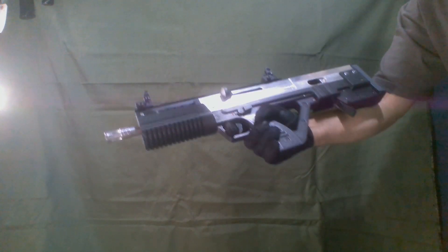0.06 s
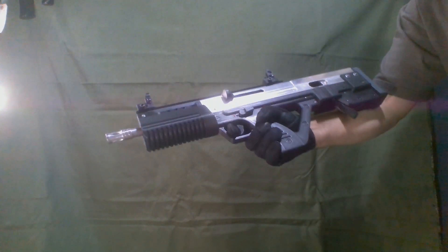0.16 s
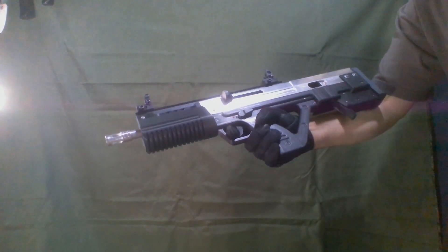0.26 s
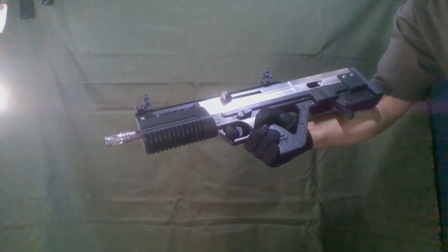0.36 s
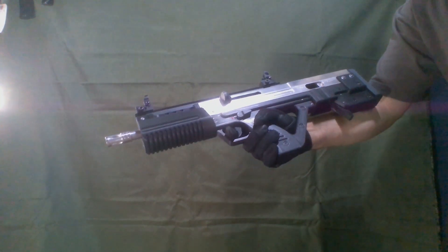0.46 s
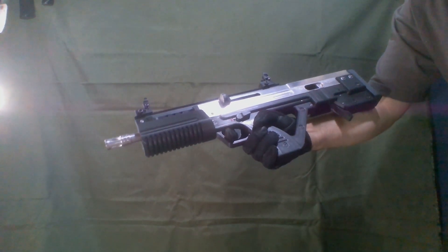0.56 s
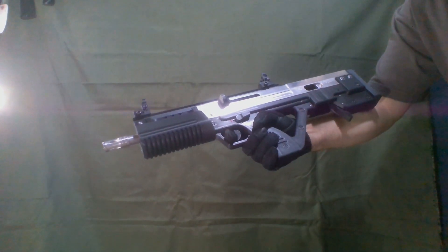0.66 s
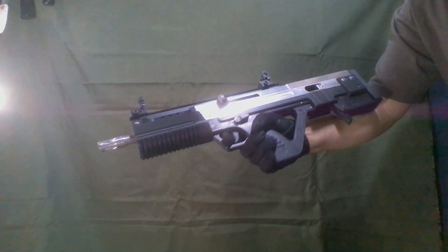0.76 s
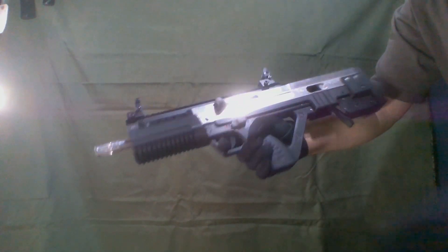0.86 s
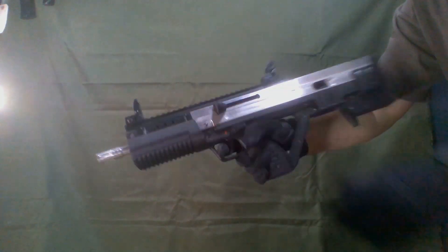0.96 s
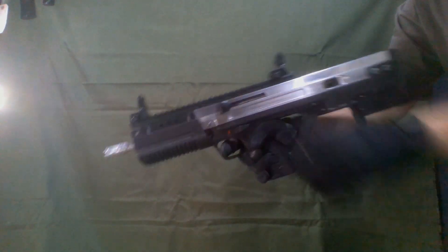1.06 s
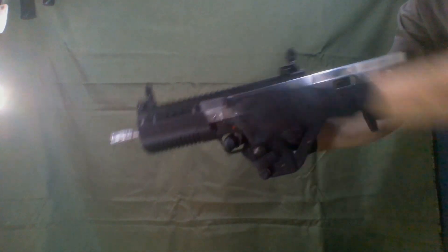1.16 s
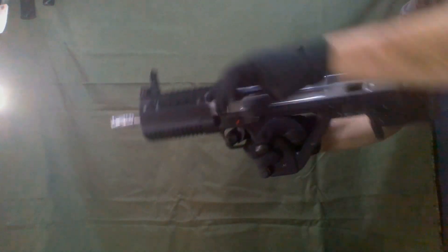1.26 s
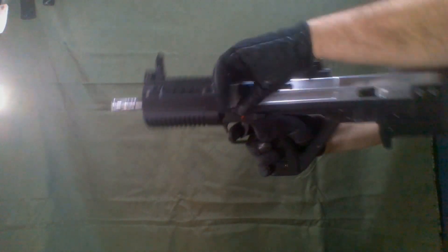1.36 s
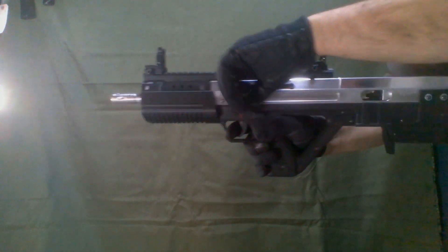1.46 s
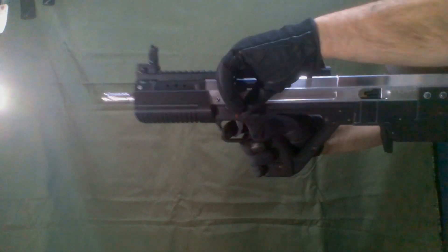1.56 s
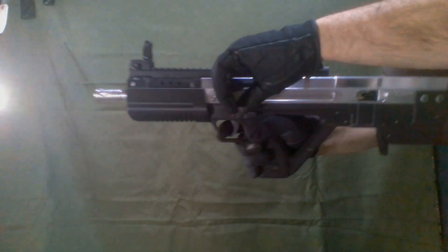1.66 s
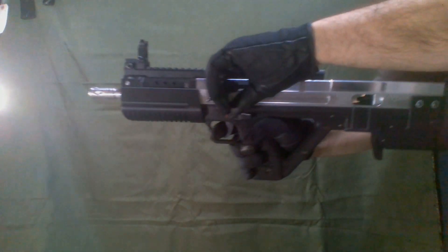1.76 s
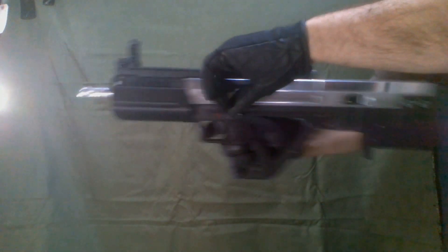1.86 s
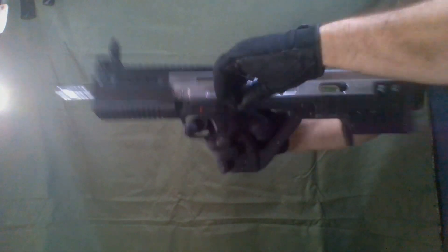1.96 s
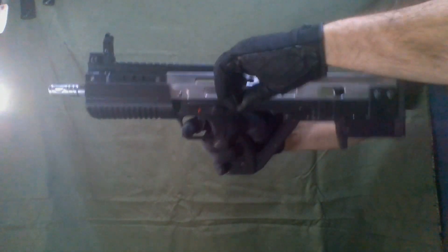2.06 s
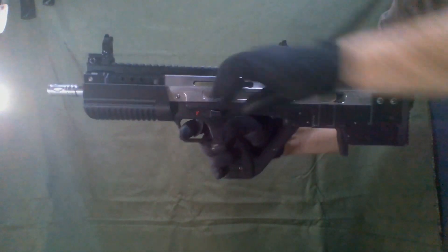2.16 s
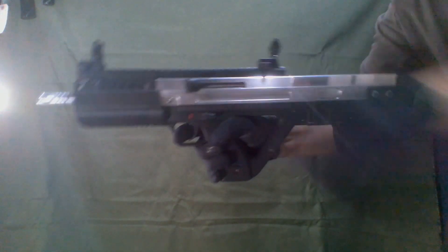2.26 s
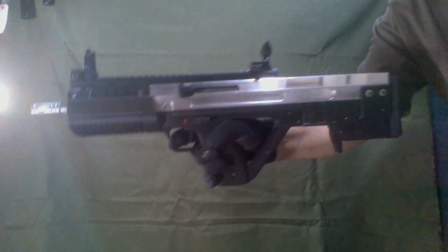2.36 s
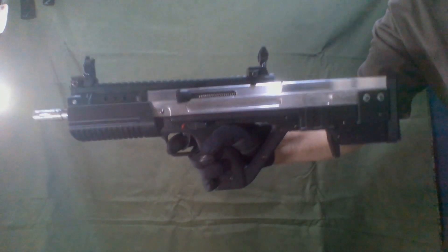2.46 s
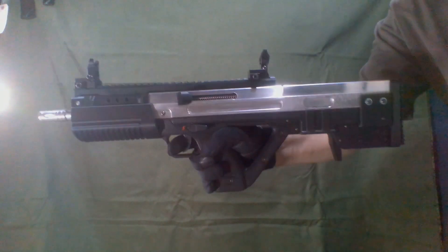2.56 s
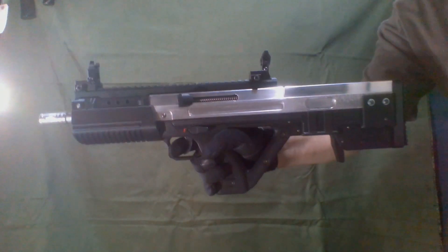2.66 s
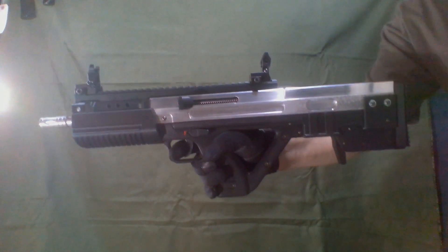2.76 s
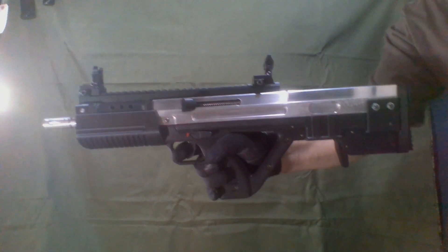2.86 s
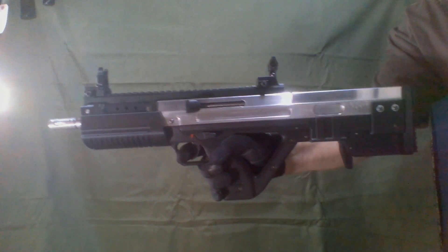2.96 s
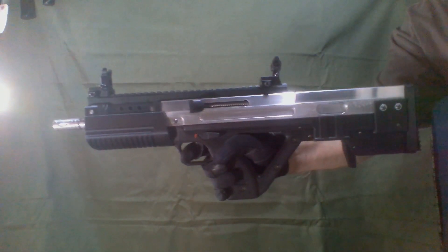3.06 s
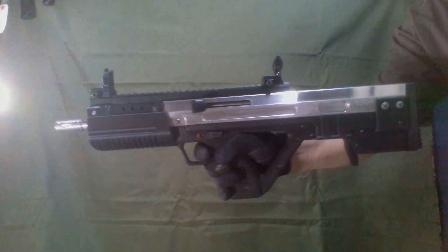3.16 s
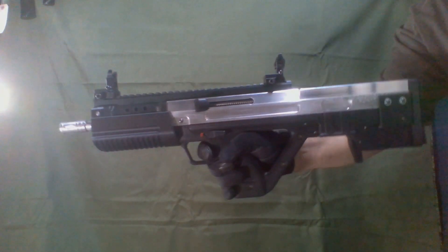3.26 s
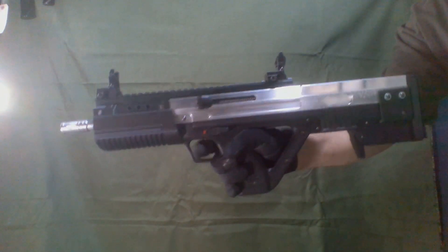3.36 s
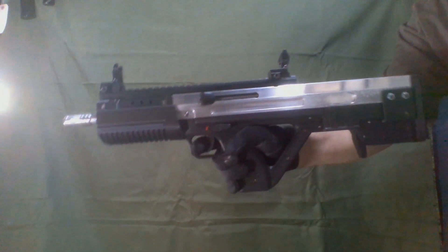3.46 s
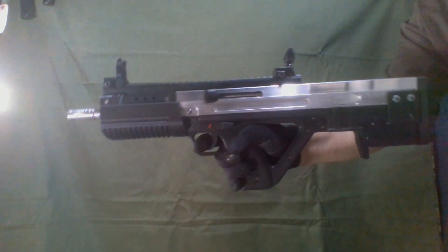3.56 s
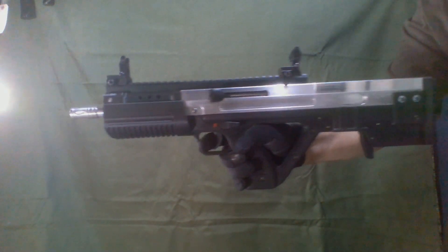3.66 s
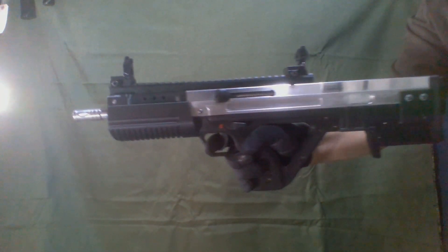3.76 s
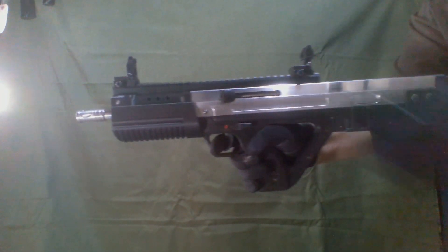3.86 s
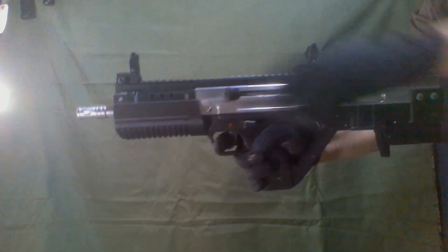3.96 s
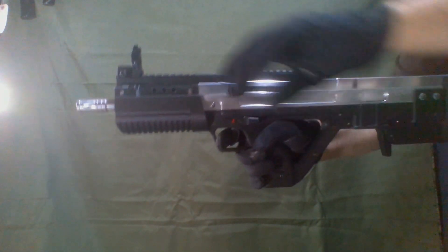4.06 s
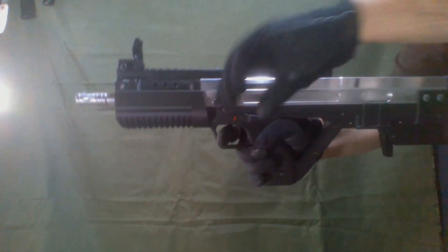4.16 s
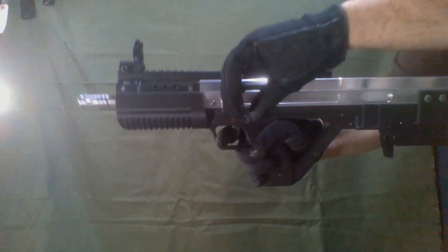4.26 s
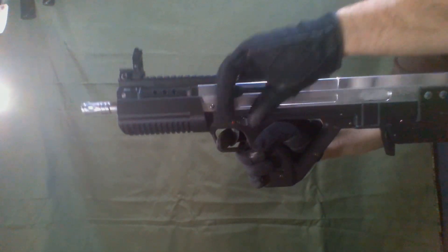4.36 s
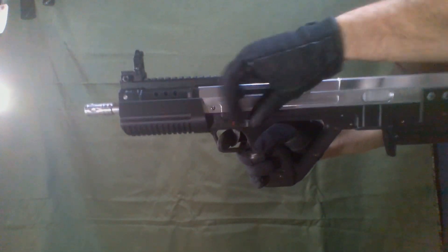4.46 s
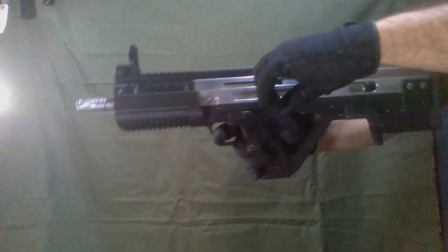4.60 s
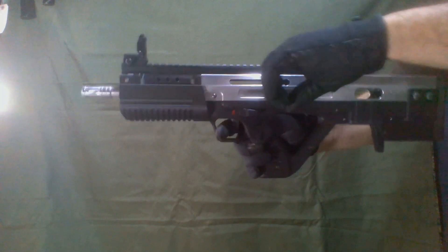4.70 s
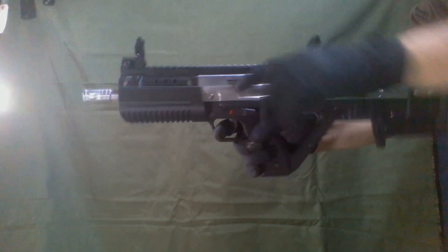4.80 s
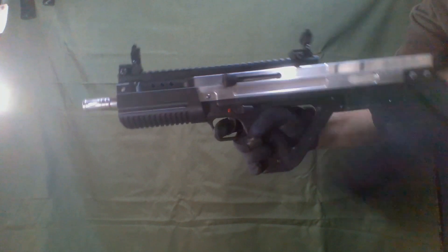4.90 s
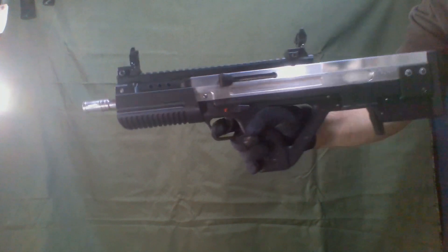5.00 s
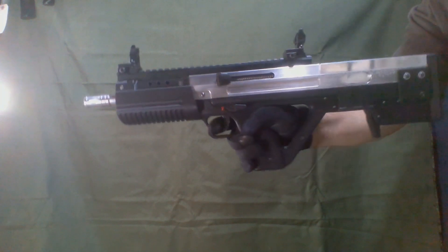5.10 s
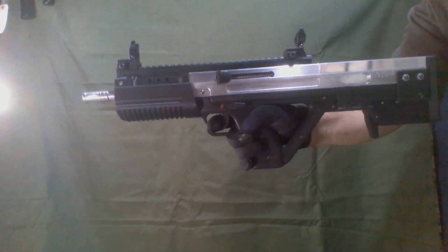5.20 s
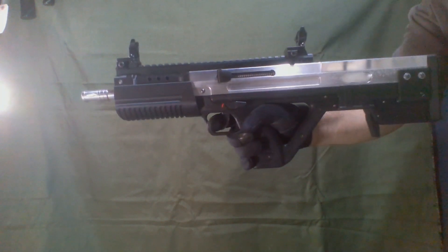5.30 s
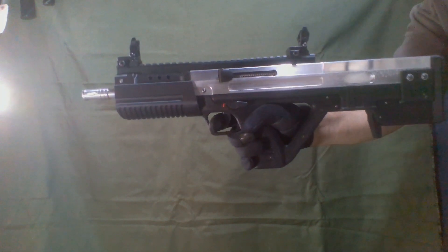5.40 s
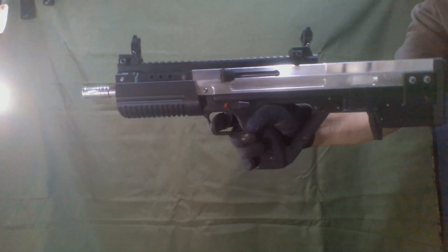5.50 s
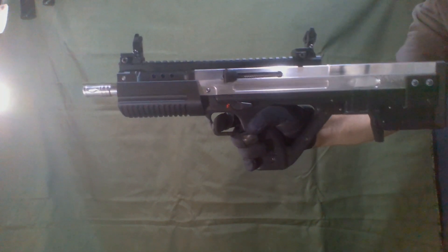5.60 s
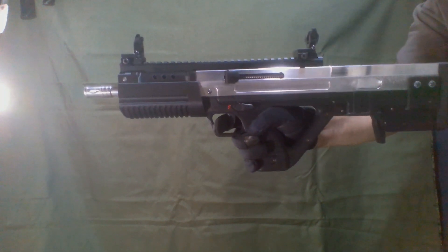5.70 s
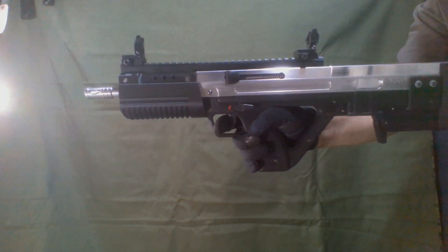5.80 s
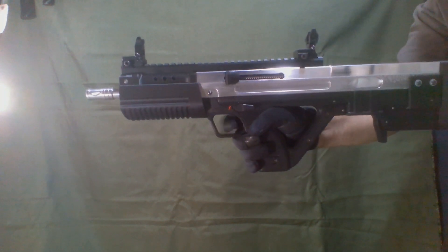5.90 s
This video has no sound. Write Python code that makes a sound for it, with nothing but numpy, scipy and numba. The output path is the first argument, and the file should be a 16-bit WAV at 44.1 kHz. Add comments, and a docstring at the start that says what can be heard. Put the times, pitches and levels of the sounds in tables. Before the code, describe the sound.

In a small room, close stereo microphone, a low motor hum and faint hiss run throughout. A flurry of dull, boomy knocks comes first. Then a carbine's handle clacks, its bolt slams home with a bright steel clatter, and the trigger snaps dry. The cycle repeats with a rattlier pull, another slam and a weaker snap at the very end. No shots.

```python
"""Handling of an airsoft carbine

Dull knocks close to a small stereo camera come first: noise bursts through low, damped resonances.
Then, twice over, the bolt is drawn back, slams forward, and the trigger lets it snap: bursts and
grains of noise excite the modes of steel parts and a hollow frame, and a room adds reverberation.
A motor hums as a long series of harmonics over broad noise; a limiter ducks these after loud blows."""
import sys
import numpy as np
from scipy import signal
from scipy.fft import rfft, irfft, next_fast_len
from scipy.io import wavfile
from scipy.ndimage import map_coordinates
from numba import njit

SR = 44100
rng = np.random.default_rng(int(sys.argv[2]) if len(sys.argv) > 2 else 0)


def log_audio(samples):
    """Write samples as a 16-bit WAV file to the path given in sys.argv[1]."""
    # one column per channel
    frames = np.atleast_2d(samples).T
    # limit to full scale, then quantise
    limited = np.clip(frames, -1, 1)
    pcm = np.round(limited * 32767).astype(np.int16)
    wavfile.write(sys.argv[1], SR, pcm)


N = 261954
SPAN = 8192  # room for filter tails, samples

# Levels in the tables are relative: the filters, the mix and the limiter act on them afterwards.
# broad noise: spectral density [f/Hz, level/dB]
AIR_SPECTRUM = [(15, -3), (60, -7.5), (170, -15.5), (345, -12.5), (635, -23.5), (825, -21.5), (1310, -15.5),
                (1970, -17), (2280, -26), (3370, -22.5), (4320, -23.5), (5360, -25.5), (6580, -21.5),
                (7540, -23.5), (10100, -26.5), (15500, -25.5)]
# broad noise: likeness of the two ports [f/Hz, correlation]
AIR_CORRELATION = [(60, 0.59), (300, 0.85), (1400, 0.054), (3000, 0.065)]
# motor speed [t/s, turns per second]
MOTOR_SPEED = [(0, 49.21), (1.3, 49.165), (2.8, 49.163), (4, 49.2), (5.94, 49.206)]
# motor harmonics [multiple of the speed, level/dB, left minus right level/dB]
MOTOR_HARMONICS = [(6, -46, -3), (7, -37, -2), (8, -39, 2), (9, -50, 11), (10, -57, 0), (14, -56, -5),
                   (17, -51, 0), (18, -56, -1), (20, -58, -1), (21, -56, -2), (22, -56, -4), (24, -48, -10),
                   (26, -49, 1), (27, -56, -2), (28, -51, -6), (29, -54, 6), (30, -50, 10), (31, -57, 14),
                   (40, -51, 1), (41, -58, 1), (66, -58, -10), (67, -62, -11), (69, -62, -18),
                   (70, -60, -9), (72, -62, -15)]
# steady tones unrelated to the motor [f/Hz, level/dB]
STEADY_TONES = [(229.85, -46), (1780.9, -51)]
# slow swings of the signal's middle [t/s, left size, right size, standard deviation/s]
BASELINE_SWINGS = [(.43, .025, .055, 0.012), (.53, -.025, -0.036, 0.055), (2.192, 0.13, 0.044, 0.0086),
                   (4.802, 0.0068, -.075, 0.0021), (4.81, 0.044, -0.018, .009),
                   (4.86, -0.017, -0.0062, 0.049)]
# reverberation time of the room [f/Hz, t60/s]
ROOM_T60 = [(200, 0.28), (1200, 0.21), (6000, 0.18), (14000, 0.11)]
# knocks near the camera [t/s, knock level/dB, knock f/Hz, thud level/dB, click level/dB]
KNOCK_EVENTS = [(0.2953, -15.5, 1140, -10.5, -34.5), (0.3015, -38, 920, -20.5, -29),
                (0.358, -28, 760, -18.5, -46), (0.405, -25.5, 1180, -41, -32),
                (0.424, -5.5, 2040, -9.5, 3.5), (0.465, -37, 750, -15, -44), (0.481, 3, 1000, -2, -9.5),
                (0.492, 6.5, 1340, 3.5, 4), (0.499, -8, 1500, 1, -51), (0.509, -2.5, 1210, -12, -45),
                (0.526, 6.5, 1370, 1, -18), (0.545, -6, 1400, -7.5, -34)]
# modes of the shell [f/Hz, width/Hz, level/dB]
SHELL_MODES = [(67.3, 10, 1), (277, 56, -0.59), (536, 74, 0.78)]
# modes of the clicking catch [f/Hz, width/Hz, level/dB]
CATCH_MODES = [(2150, 260, 7), (3970, 220, 0), (4610, 250, -3), (6310, 250, -7), (7320, 250, -2),
               (10200, 300, -4)]
# modes of the hollow frame [f/Hz, width/Hz, level/dB]
FRAME_MODES = [(520, 190, -6), (788, 190, -6.5), (1000, 44, 4), (1323, 150, -3.5), (1616, 170, -3.5),
               (1760, 50, -2)]
# modes of the steel parts [f/Hz, width/Hz, level/dB]
STEEL_MODES = [(3987, 150, -2.5), (4900, 170, 0.5), (5570, 270, -8), (5960, 41, -12.5), (6460, 63, 4.5),
               (7620, 230, 5.5), (7850, 280, -7), (8340, 720, 10), (9130, 450, 4), (9200, 200, -14.5)]
# harder contacts ring brighter [steel level/dB, f/Hz]
STEEL_BRIGHTNESS = [(-21, 4740), (3.5, 6410)]
# the bolt slams home [t/s, strength level/dB]
SLAM_EVENTS = [(2.183, -2.5), (4.7995, -2.5)]
# contacts within a slam [t/s from the blow, steel level/dB, frame level/dB, frame f/Hz]
SLAM_CONTACTS = [(-.0185, -1.5, -21, 1566), (-.012, 0, -12.5, 1450), (-.004, 6, -7.5, 1270),
                 (0, 10.5, 1, 1070), (.0055, 12.5, 0.5, 1345), (.016, 12.5, 2, 1150), (.0435, 8.5, 0, 1040),
                 (.053, 7, -5.5, 1270), (.066, 1, -7.5, 1400)]
# the trigger lets the striker go [t/s, strength level/dB]
SNAP_EVENTS = [(3.133, -4.5), (5.921, -10.5)]
# contacts within a snap: the frame swells, then the steel answers
# [t/s from the blow, steel level/dB, frame level/dB, frame f/Hz]
SNAP_CONTACTS = [(-.009, -23.5, -22.5, 1710), (-.0055, -9, -12.5, 1615), (-.002, -6, -0.5, 1620),
                 (0, 7, 4, 1730), (.003, 14, -9.5, 1650), (.008, -3, -11.5, 1700)]
# single contacts of handle and catches [t/s, steel level/dB, frame level/dB, frame f/Hz]
SINGLE_CONTACTS = [(1.876, 8, -8, 1224), (1.879, -6, -13, 1430), (1.882, -1.5, -18, 1360),
                   (1.905, -9, -8.5, 1000), (3.357, -38.5, -30.5, 1420), (4.159, -26.5, -32, 1310),
                   (4.361, -32, -37.5, 1380), (4.44, -16.5, -25.5, 1150), (4.455, -22, -27, 1370),
                   (4.4772, 5, -14, 1283), (4.481, -8.5, -12, 1370), (4.495, -3.5, -16, 1730),
                   (4.5004, 0, -15, 1810), (4.518, -9.5, -18, 1590), (4.5234, 6, -11, 1610),
                   (4.566, -13, -18, 1040), (4.574, -28.5, -18, 1050), (5.89, -27.5, -41, 1400)]
# the handle is drawn back along the rails [t/s of loudest rattle, level/dB, swell/s, fade/s]
HANDLE_PULLS = [(1.885, -15.5, 0.059, .04), (4.51, -12.5, .09, 0.072)]

# rattle around a blow: (t/s of loudest rattle from the blow, level/dB, swell/s, fade/s)
SLAM_RATTLE, SNAP_RATTLE = (0.013, 2, 0.062, 0.096), (-.004, -8, 0.01, 0.04)
RATTLE_RANGE_DB = 34.5  # climbed in one swell time, lost in one fade time
# kinds of contact: (decay t60/s, relative width of the frame's broad response, size of the first push)
SLAM_TOUCH, SNAP_TOUCH, SINGLE_TOUCH = (0.035, 1.62, 4.2), (0.027, 0.81, 0), (0.019, 1.03, 1)
KNOCK_T60_S, THUD_T60_S, CLICK_T60_S = 0.036, 0.045, 0.022
SOFT_HZ, SOFT_Q = 2300, 0.45  # low-pass of a padded contact
BOOM_DB, BOOM_GROWTH = 36.5, 0.28  # the stand's boom follows the thud level only weakly
# a tone as strong as the seventh harmonic beats with it; they first cancel at this moment
NEIGHBOUR_HZ, CANCEL_S = 344.705, 1.4
SWING_CUT_HZ = 1.1
MICROPHONE_HZ, TOP_HZ = 9000, 15650
ATTACK_S, HOLD_S, RELEASE_S = 0.0001, 0.085, 0.24
THRESHOLD_DB, CEILING = -1.83, 0.82


def amp(db):
    """Decibel law: the amplitude ratio of a level."""
    return 10 ** (np.asarray(db) / 20)


def unit(x):
    """Normalization: the signal scaled to unit rms."""
    return x / np.sqrt(np.mean(x ** 2) + 1e-20)


def along(points, hz):
    """Interpolation of (f, value) points on a logarithmic frequency axis."""
    f, value = np.transpose(points)
    return np.interp(np.log(hz + 1), np.log(f + 1), value)


def curve(rows):
    """Linear interpolation of (t, value) rows at every sample."""
    return np.interp(np.arange(N) / SR, *np.transpose(rows))


def wobble(rate):
    """Spline interpolation: a smooth random curve through `rate` knots a second."""
    knots = rng.standard_normal(int(N * rate / SR) + 4)
    return map_coordinates(knots, [np.arange(N) * rate / SR])


def filtered(x, response):
    """Linear filtering: the spectrum times a complex response of frequency."""
    n = x.shape[-1]
    m = next_fast_len(n + SPAN)
    return irfft(rfft(x, m) * response(np.fft.rfftfreq(m, 1 / SR)), m)[..., :n]


def peak(f, hz, width_hz):
    """Damped resonance: the causal second-order band-pass response of one mode."""
    return 1j * f * width_hz / (hz * hz - f * f + 1j * f * width_hz)


def low_pass(f, hz, q):
    """Inertia and damping: a second-order response that falls above its corner."""
    return 1 / (1 + 1j * f / hz / q - (f / hz) ** 2)


def body(modes, hz, spread, broad_db):
    """Modal superposition: randomly reweighted modes on a broad response, favoured near one tone."""
    chance_db = rng.normal(0, 3, len(modes))

    def response(f):
        ringing = sum(amp(db + chance) * peak(f, mode_hz, width_hz)
                      for (mode_hz, width_hz, db), chance in zip(modes, chance_db))
        return peak(f, hz, spread * hz) ** 2 * (amp(broad_db) + ringing)

    return response


def burst(response, t60, alike, push=0., rise=.0013):
    """Impact excitation: a push and decaying stereo noise filtered by a body, unit rms over 4 ms."""
    t = np.arange(SPAN // 2) / SR
    envelope = amp(-60 * t / t60) * (1 - np.exp(-t / rise))
    common, opposed = rng.standard_normal((2, len(t))) * envelope
    turn = np.arccos(np.clip(alike, 0, 1)) / 2  # cos(2 turn) is the correlation of the ports
    noise = np.cos(turn) * common + np.sin(turn) * np.array([opposed, -opposed])
    x = filtered(noise + push * (t == 0), response)
    return x / np.sqrt(np.mean(x[:, :SR // 250] ** 2))


def add(track, s, x):
    """Superposition: mixes x into the track at time s."""
    track[:, round(s * SR):][:, :x.shape[1]] += x


def air():
    """Partial coherence: room air and microphone hiss, most alike at the two ports in the bass."""
    turn = lambda hz: np.arccos(np.clip(along(AIR_CORRELATION, hz), -1, 1)) / 2
    response = lambda hz: amp(along(AIR_SPECTRUM, hz)) * [np.cos(turn(hz)), np.sin(turn(hz))]
    mid, side = filtered(rng.standard_normal((2, N)), response)
    return amp(-38.0 + 0.21 * wobble(23)) * unit(np.array([mid + side, mid - side]))


def motor_harmonics(turns, t):
    """Harmonic series of a rotation: sines at multiples of the speed, one beating with a neighbour."""
    out = np.zeros((2, N))
    waver_db = [1.2 * wobble(4.71) for _ in range(4)]
    for k, db, pan_db in MOTOR_HARMONICS:
        start, lead = rng.uniform(0, 2 * np.pi), rng.normal(0.3, 0.52)
        if k < 10:  # the low harmonics keep loosely in step, one throb a turn
            start = .95 * abs(k - 7)
        cycles = [k * turns]
        if k == 7:
            opposite = k * turns[round(CANCEL_S * SR)] + .5
            cycles.append(opposite + NEIGHBOUR_HZ * (t - CANCEL_S))
        for port, side in enumerate((.5, -.5)):
            level_db = db - 0.54 + side * pan_db + waver_db[int(k) % 4]
            tone = sum(np.sin(2 * np.pi * c + start + side * lead) for c in cycles)
            out[port] += amp(level_db) * tone
    return out


def faint_harmonics(turns):
    """Fourier synthesis: one fixed random waveform for each port, repeated every turn."""
    k = np.arange(512)
    faint = amp(-65 - .06 * k + rng.normal(0, 3.5, (2, k.size))) * (k > 9) * (k < 110)
    faint[:, [int(row[0]) for row in MOTOR_HARMONICS]] = 0
    waves = irfft(faint * np.exp(2j * np.pi * rng.random(faint.shape))) * (k.size - 1)
    phase = np.linspace(0, 1, waves.shape[1], endpoint=False)
    return amp(4.0) * np.array([np.interp(turns % 1, phase, wave, period=1) for wave in waves])


def hum():
    """Periodicity: strong and faint harmonics of one motor speed, with two unrelated tones."""
    turns, t = np.cumsum(curve(MOTOR_SPEED)) / SR, np.arange(N) / SR
    out = motor_harmonics(turns, t) + faint_harmonics(turns)
    for hz, db in STEADY_TONES:
        out += amp(db + 0.47 * wobble(4.07)) * np.sin(2 * np.pi * hz * t)
    return out


def swings():
    """High-pass rebound: smooth bumps under the hardest blows, turned back slowly by the input's low cut."""
    t = np.arange(N) / SR
    bumps = sum(np.outer(size, np.exp(-.5 * ((t - s) / width) ** 2))
                for s, *size, width in BASELINE_SWINGS)
    low_cut = lambda f: -f * f / (SWING_CUT_HZ ** 2 + 1j * f * SWING_CUT_HZ * 1.9 - f * f)
    return filtered(bumps, low_cut)


def room(x):
    """Reverberation: frequency-dependent decay, with a new tail each third of a second as the carbine moves."""
    out, step = np.zeros((2, N + 2 * SR)), SR // 3
    for i in range(0, N, step):
        hz, t, grid = signal.stft(rng.standard_normal((2, SR // 2)), SR, nperseg=256)
        decay = amp(-60 * t / along(ROOM_T60, hz)[:, None])
        tail = signal.istft(grid * decay, SR, nperseg=256)[1]
        reflected = signal.fftconvolve(x[:, i:i + step], tail / np.linalg.norm(tail[0]), axes=1)
        add(out, i / SR + .004, reflected)
    return out[:, :N]


def knocks():
    """Padded impact: a soft mid knock and shell thud, the click of a catch, and the stand's resonance."""
    out, jolts = np.zeros((2, N + SPAN)), np.zeros(N + SPAN)
    soft = lambda f: low_pass(f, SOFT_HZ, SOFT_Q) ** 2
    for s, knock_db, knock_hz, thud_db, click_db in KNOCK_EVENTS:
        shell = body(SHELL_MODES, hz=300, spread=2.87, broad_db=-2.0)
        catch = body(CATCH_MODES, hz=5000, spread=3, broad_db=-10)
        mid = lambda f: peak(f, knock_hz, 0.31 * knock_hz) * soft(f)
        knock = burst(mid, KNOCK_T60_S, alike=0.65, push=4.5)
        thud = burst(lambda f: shell(f) * soft(f), THUD_T60_S, alike=0.71, push=5.1, rise=0.0026)
        click = burst(catch, CLICK_T60_S, alike=.3)
        add(out, s, amp(knock_db) * knock + amp(thud_db) * thud + amp(click_db) * click)
        jolts[round(s * SR)] = amp(BOOM_DB + BOOM_GROWTH * thud_db)
    # the camera's stand goes on booming
    boom = filtered(jolts, lambda f: peak(f, hz=63, width_hz=14.0))
    return amp([[-.6], [.6]]) * (out + boom)[:, :N]


def rattle_db(strokes):
    """Exponential growth and decay: each stroke's level climbs and falls evenly in dB; the loudest wins."""
    t = np.arange(N) / SR
    levels = [db - RATTLE_RANGE_DB * np.maximum((s - t) / swell, (t - s) / fade)
              for s, db, swell, fade in strokes]
    return np.max(levels, axis=0)


def rattle(strokes, steel_gain):
    """Granular excitation: noise of rapidly varying level rings steel and frame as the bolt moves."""
    grains = unit(amp(2.4 * wobble(600)) * rng.standard_normal((2, N)))
    steel = unit(filtered(grains, body(STEEL_MODES, hz=6400, spread=1.66, broad_db=13)))
    shared = grains[0] + 0.15 * grains  # nearly alike at both ports
    frame = unit(filtered(shared, body(FRAME_MODES, hz=1310, spread=3.0, broad_db=5.5)))
    return amp(rattle_db(strokes)) * (steel_gain * steel + amp(-5.5) * frame)


def carbine():
    """Modal excitation: each contact rings the steel and the hollow frame; the bolt's rattle joins them."""
    out = np.zeros((2, N + SPAN))
    steel_gain = amp([[1.6], [-1.6]])  # the bright parts face the left port
    hits = [(*row, *SINGLE_TOUCH) for row in SINGLE_CONTACTS]
    strokes = list(HANDLE_PULLS)
    blows = ((SLAM_EVENTS, SLAM_CONTACTS, SLAM_TOUCH, SLAM_RATTLE),
             (SNAP_EVENTS, SNAP_CONTACTS, SNAP_TOUCH, SNAP_RATTLE))
    for events, contacts, touch, (offset, level_db, *shape) in blows:
        for s, db in events:
            hits += [(s + d, db + steel, db + frame, hz, *touch) for d, steel, frame, hz in contacts]
            strokes.append((s + offset, db + level_db, *shape))
    for s, steel_db, frame_db, frame_hz, t60, spread, push in hits:
        steel_hz = np.interp(steel_db, *np.transpose(STEEL_BRIGHTNESS))
        steel_body = body(STEEL_MODES, steel_hz, spread=0.94, broad_db=7)
        frame_body = body(FRAME_MODES, frame_hz, spread=spread, broad_db=-7.0)
        steel = burst(steel_body, t60, alike=.1)
        frame = burst(frame_body, 0.94 * t60, alike=0.58, push=push)
        add(out, s, amp(steel_db) * steel_gain * steel + amp(frame_db) * frame)
    return out[:, :N] + rattle(strokes, steel_gain)


def scene():
    """Superposition: direct and reverberant sound of carbine and knocks, over hum and air."""
    gun, blows = carbine(), knocks()
    reverberant = room(amp(-8.5) * gun + amp(-16.0) * blows)
    return gun + blows + reverberant + hum() + air()


@njit
def ducking(over_db, attack, hold, release):
    """Gain control: the reduction in dB follows an excess fast, holds, then lets go slowly."""
    out, cut, wait = np.zeros(len(over_db)), 0., 0.
    for i in range(len(over_db)):
        if over_db[i] > cut:
            cut += (over_db[i] - cut) * attack
            wait = hold
        elif wait > 0:
            wait -= 1
        else:
            cut -= cut * release
        out[i] = cut
    return out


def record(dry):
    """Transduction and limiting: a dull microphone, limiter, added swings, soft clipping, band limit."""
    dry = filtered(dry, lambda f: low_pass(f, MICROPHONE_HZ, 0.5))
    over_db = 20 * np.log10(np.abs(dry).max(0) + 1e-9) - THRESHOLD_DB
    cut_db = ducking(over_db, 1 / (ATTACK_S * SR), HOLD_S * SR, 1 / (RELEASE_S * SR))
    x = dry * amp(-cut_db) + swings()
    x = x / (1 + np.abs(x / CEILING) ** 6) ** (1 / 6)
    return filtered(x, lambda hz: hz < TOP_HZ)


dry = scene()
out = record(dry)
log_audio(out)
```